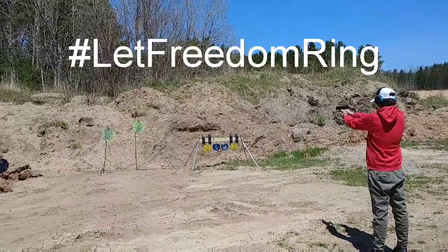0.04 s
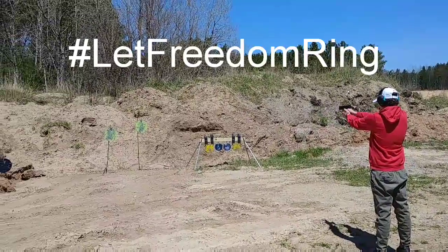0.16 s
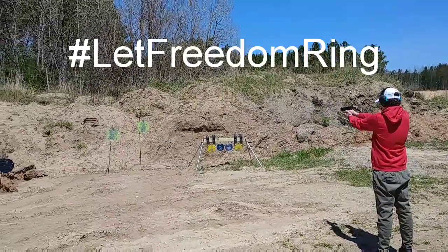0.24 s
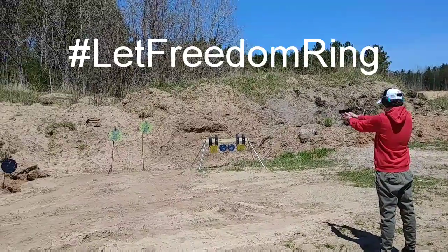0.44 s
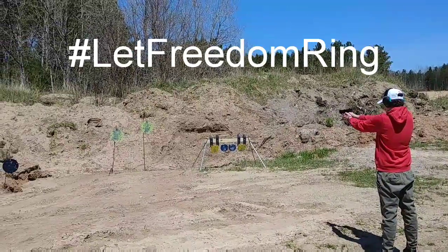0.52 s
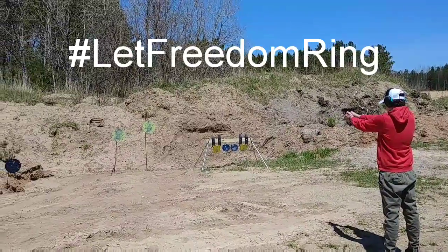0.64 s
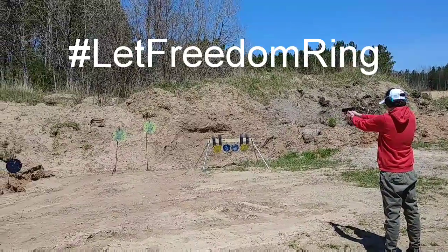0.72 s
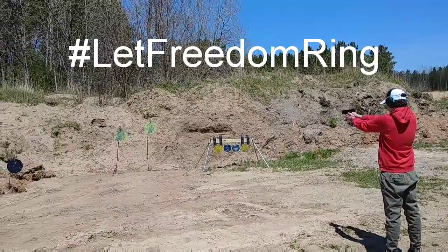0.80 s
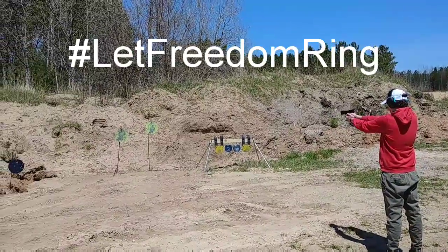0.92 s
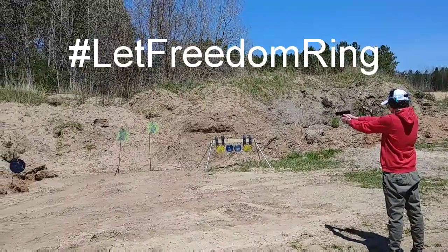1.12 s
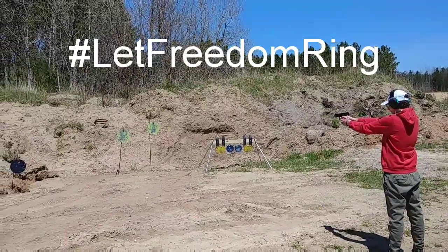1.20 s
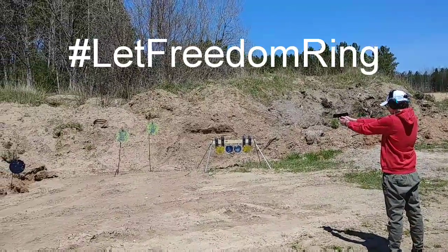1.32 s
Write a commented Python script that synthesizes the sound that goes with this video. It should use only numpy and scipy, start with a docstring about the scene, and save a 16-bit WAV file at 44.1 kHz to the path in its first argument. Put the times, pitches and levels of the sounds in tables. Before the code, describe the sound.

Two loud pistol cracks come in quick succession, slightly overloading a nearby microphone. Right after each one, a steel target clangs and rings out, mixed with short echoes from the sand bank and woods of an open-air range.

```python
"""Two handgun shots at steel plates

Outdoors on a sand range, with a camera's stereo microphone a few metres behind the shooter.
Each muzzle blast overloads the microphone; 40 ms later the bullet smacks a hanging steel plate,
which rings and swings. The sand bank and the woods behind it throw the blasts back."""
import sys
import numpy as np
from scipy import signal
from scipy.fft import rfft, irfft
from scipy.io import wavfile
from scipy.ndimage import uniform_filter1d, minimum_filter1d

SR = 44100
rng = np.random.default_rng(int(sys.argv[2]) if len(sys.argv) > 2 else 0)


def store_wav(level_fs):
    """Save 16-bit WAV to argv[1]."""
    pcm = np.round(np.clip(np.atleast_2d(level_fs), -1, 1) * 32767)
    wavfile.write(sys.argv[1], SR, pcm.T.astype(np.int16))


N = 59535
TIME = np.arange(N) / SR
HZ = np.fft.rfftfreq(N, 1 / SR)


def amp(db):
    """Decibels to gain."""
    return 10 ** (np.asarray(db) / 20)


def unit_rms(x):
    """Scales to rms 1."""
    return x / np.sqrt(np.mean(x ** 2) + 1e-20)


def curve(points, hz):
    """Reads a table on a log-frequency axis."""
    freqs, values = np.transpose(points)
    return np.interp(np.log(hz + 1), np.log(abs(freqs) + 1), values)


def pan(db):
    """Left and right gains for a left-minus-right level."""
    return amp(np.array([[db / 2], [-db / 2]]))


def since(start):
    """Seconds since a moment, zero before it."""
    return np.maximum(TIME - start, 0)


def bell(hz, octaves):
    """A bell-shaped spectrum in dB."""
    return -40 * np.log10(1 + (np.log2((HZ + 1) / hz) / octaves) ** 2 / 2)


def hold_and_decay(t, hold, t60, knee_s=0.04):
    """Level that holds, then bends into an exponential decay."""
    return amp(-60 * knee_s * np.logaddexp(0, (t - hold) / knee_s) / t60)


def falling_sine(t, end_hz, drop_hz, glide_s):
    """A sine that glides down by drop_hz to settle at end_hz."""
    turns = end_hz * t + drop_hz * glide_s * (1 - np.exp(-t / glide_s))
    return np.sin(2 * np.pi * turns)


# How alike the microphone's two ports sound: (frequency [Hz], correlation [-1..1])
PORT_CORRELATION = [(50, -0.1), (200, 0.7), (500, 0.72), (900, 0.075), (1500, -0.44), (2500, -0.028),
                    (5000, -0.19), (15000, -0.53)]

def noise(spectrum_db):
    """Coloured noise as the two microphone ports hear it."""
    left, independent = rfft(rng.standard_normal((2, N)))
    alike = np.clip(curve(PORT_CORRELATION, HZ), -1, 1)
    right = alike * left + np.sqrt(1 - alike ** 2) * independent
    return unit_rms(irfft(np.array([left, right]) * amp(spectrum_db), N))


def burst(start, db, decay, hz, octaves, pan_db):
    """A sudden puff of band noise that dies away."""
    envelope = (TIME > start) * np.exp(-since(start) / decay)
    return amp(db) * pan(pan_db) * envelope * noise(bell(hz, octaves))


def swell(peak_s, db, half_width_s, hz):
    """Band noise that comes and goes smoothly."""
    return amp(db) * np.exp(-((TIME - peak_s) / half_width_s) ** 2) * noise(bell(hz, octaves=0.7))


# Far end of the range: (frequency [Hz], spectral level [dB])
DISTANT_SPECTRUM = [(15, -46), (25, -25), (102, -6.5), (195, -18), (344, -14), (624, -1), (1130, -2.5),
                    (1520, -9.5), (1840, -7), (4250, -37.5), (4870, -33), (14400, -45), (16000, -53.5)]

def distant_range():
    """Far echoes of earlier shots, blurred into a steady bed."""
    return amp(-37) * pan(db=2) * noise(curve(DISTANT_SPECTRUM, HZ))


# Low swells at the microphone: (peak time [s], level [dB], half-width [s], centre [Hz])
RUMBLE_SWELLS = [(0.35, -33, 0.11, 18), (0.71, -44, 0.026, 79), (0.41, -50.5, 0.075, 65)]

def low_rumbles():
    """Low rumbles, mostly on the right port: a deep one under the first plate's ring,
    and a light puff of wind at 0.71 s."""
    steady = amp(-56) * noise(bell(hz=66.5, octaves=0.81))
    return pan(db=-13) * (steady + sum(swell(*rumble) for rumble in RUMBLE_SWELLS))


# Spent cases: (time [s], level [dB], decay [s], centre [Hz], width [octaves], left-right [dB])
CASE_TICKS = [(.036, -43.5, 0.0035, 5650, 0.089, 4), (.703, -45, .012, 4730, 0.54, 8)]

def spent_cases():
    """Spent cases tick faintly, left of the microphone."""
    return sum(burst(*tick) for tick in CASE_TICKS)


# Colour of the echoes from downrange: (frequency [Hz], spectral level [dB])
WASH_SPECTRUM = [(30, -28.5), (150, -20), (350, -21.5), (520, -4.5), (900, -3.5), (1500, -5), (2100, -4.5),
                 (2700, -12), (3700, -10), (5000, -13.5), (7800, -12.5), (9700, -44), (16000, -47)]
# Their decay, before each shot's stretch: (frequency [Hz], T60 [s])
WASH_T60 = [(60, 0.63), (250, 0.92), (700, 0.68), (2000, 0.5), (4500, 0.32), (12000, 0.18)]
# Their balance at the microphone: (frequency [Hz], left-right [dB])
WASH_BALANCE = [(50, -12.5), (200, 4), (700, 4), (2000, 1.5), (5000, 4.5), (15000, -28.5)]

def echo_wash(start, db, hold, stretch, delay_s=0.024, rise_s=0.016):
    """Dense echoes from bank and woods; the level flickers and the treble dies first."""
    hz, t, bands = signal.stft(noise(curve(WASH_SPECTRUM, HZ)), SR, nperseg=512, noverlap=384)
    bands *= hold_and_decay(t[None] - start, hold, stretch * curve(WASH_T60, hz)[:, None])
    bands *= amp(np.array([[0.5], [-0.5]]) * curve(WASH_BALANCE, hz))[:, :, None]
    tail = signal.istft(bands, SR, nperseg=512, noverlap=384)[1][:, :N]
    flicker = amp(2.55 * unit_rms(uniform_filter1d(rng.standard_normal(N), size=300)))
    onset = 1 - np.exp(-since(start + delay_s) / rise_s)
    return amp(db - 16) * onset * flicker * tail


# Reflections: (time [s], level [dB], decay [s], centre [Hz], width [octaves], left-right [dB])
REFLECTIONS = [(.2563, -8, .004, 1600, .6, 3), (.272, -15, .012, 1200, 1.0, 3),
               (.8435, -9.5, .006, 1500, .7, 3), (.358, -15, .03, 700, .55, 4),
               (.925, -12, .016, 950, 1.3, 3), (.428, -18, .02, 1000, .7, 3), (.376, -13, .01, 650, .6, 3),
               (.405, -15, .008, 1200, .8, 3), (.941, -12, .01, 600, .5, 3)]

def distinct_echoes(last_shot):
    """Short reflections follow each shot; one faint echo of the last returns from far off."""
    far_echo = swell(last_shot + 0.542, db=-42, half_width_s=0.027, hz=1800)
    return far_echo + sum(burst(*reflection) for reflection in REFLECTIONS)


# Booms from the bank downrange: (time [s], level [dB])
BANK_BOOMS = [(0.269, -24), (.835, -23.5)]

def bank_boom(start, db, peak_s=0.0098, roughness=0.92):
    """The sand bank returns the thump as a rough boom that falls in pitch."""
    t = since(start)
    tone = falling_sine(t, end_hz=138.3, drop_hz=134.6, glide_s=0.022)
    rumble = roughness * noise(bell(hz=181, octaves=0.82))
    envelope = t / peak_s * np.exp(1 - t / peak_s)
    return amp(db) * envelope * (tone + rumble)


# Impacts downrange: (time [s], level [dB], decay [s], centre [Hz], width [octaves], left-right [dB])
SMACKS = [(.2622, -15, .002, 7000, 1.2, 0), (.8225, -9, .002, 4000, 1.2, 2),
          (.8265, -14, .0012, 5500, .5, 0)]

def bullet_smacks():
    """Bullets hit the steel with short, bright smacks."""
    return sum(burst(*smack) for smack in SMACKS)


def waver(rate_hz=21.2, step=64):
    """Slow random drift of level and phase, different at each port."""
    points = N // step + 2
    real, imag = rng.standard_normal((2, 2, points))
    lowpass = np.exp(-(np.fft.fftfreq(points, step / SR) / rate_hz) ** 2 / 2)
    drift = np.fft.ifft(np.fft.fft(real + 1j * imag) * lowpass)
    drift /= np.sqrt(np.mean(abs(drift) ** 2))
    return np.array([np.interp(TIME, np.arange(points) * step / SR, port) for port in drift])


def plate_shimmer(t, low_hz=5506, top_hz=15340, count=24):
    """A plate's many weak high modes blend into a shimmer."""
    out = np.zeros((2, N))
    for k, (offset, weakness) in enumerate(rng.random((count, 2))):
        hz = low_hz + (top_hz - low_hz) * (k + offset) / count
        out += amp(-10 * weakness) * (waver() * np.exp(2j * np.pi * hz * t)).real
    return unit_rms(out)


# Modes of the two plates hanging downrange: (frequency [Hz], level [dB], T60 [s],
# a dip's time after the hit [s], dip spacing [s], dip floor [0..1], left-right [dB])
FIRST_PLATE_MODES = [(848, -17.5, 0.36, 0.033, 0.25, 0.85, 5.5), (1252, -21, 0.59, 0.056, 0.21, 0.47, 2.5),
                     (2110, -17.5, 0.57, 0.085, 0.3, 0.65, -0.5), (2166, -22, 0.43, 0.18, 0.23, 0.097, 13),
                     (3175, -31.5, 0.66, 0.087, 0.3, 0.05, -15), (3337, -16, 0.28, 0.14, 0.68, 0.35, 18),
                     (3436, -26.5, 0.53, 0.417, 0.36, 0.1, 14.5), (3735, -35, 0.45, 0.36, 0.33, 0.14, -9),
                     (3913, -21, 0.22, 0.2, 0.41, 0.86, -14.5), (4720, -26, 0.72, 0.33, 0.54, 0.27, 1),
                     (5098, -15, 0.46, 0.357, 0.3, 0.75, 8), (5760, -44.5, 0.58, 0.54, 0.36, 0.05, -3),
                     (5960, -18, 0.31, 0.16, 0.68, 0.36, 6.5), (7024, -16, 0.44, 0.082, 0.37, 0.094, -12),
                     (7800, -7, 0.23, 0.21, 0.29, 0.72, -7.5), (7990, -24.5, 0.41, 0.009, 0.38, 0.05, 1),
                     (8200, -33, 0.17, 0.113, 0.16, 0.31, 4), (8960, -33.5, 0.34, 0.27, 0.37, 0.85, 10),
                     (9607, -20, 0.3, 0.045, 0.55, 0.82, 6.5), (10200, -44.5, 0.2, 0.093, 0.15, 0.53, -1.5),
                     (10550, -24.5, 0.34, 0.2, 0.66, 0.074, 12), (10896, -35, 0.61, 0.16, 0.29, 0.08, -4),
                     (11460, -21, 0.2, 0.375, 0.22, 0.17, 13), (11590, -25, 0.26, 0.12, 0.38, 0.52, -18.5),
                     (12893, -39, 0.47, 0.086, 0.22, 0.61, 6), (14000, -19.5, 0.236, 0.18, 0.6, 0.05, 8.5),
                     (16000, -26, 0.27, 0.36, 0.59, 0.05, -8)]
SECOND_PLATE_MODES = [(864, -21.5, 0.41, 0.3, 0.66, 0.35, 2), (1192, -27.5, 0.71, 0.17, 0.23, 0.23, 5),
                      (1993, -8, 0.8, 0.2, 0.26, 0.75, 1.5), (3074, -25, 0.44, 0.076, 0.37, 0.1, -5),
                      (3417, -16.5, 0.2, 0.17, 0.64, 0.15, 8), (3710, -36.5, 0.2, 0.13, 0.11, 0.66, -18),
                      (4630, -36, 0.61, 0.08, 0.37, 0.05, -9), (5085, -10.5, 0.52, 0.17, 0.31, 0.46, 8),
                      (5560, -29.5, 0.45, 0.048, 0.39, 0.05, 6), (5720, -36, 0.72, 0.2, 0.26, 0.58, 8),
                      (6957, -8, 0.4, 0.074, 0.38, 0.14, -1.5), (7860, -23.5, 0.17, 0.23, 0.82, 0.084, 19),
                      (8060, -29.5, 0.18, 0.27, 0.44, 0.12, -12), (8920, -35.5, 0.56, 0.2, 0.25, 0.38, 11),
                      (9045, -33, 0.24, 0.024, 0.22, 0.2, 9.5), (10500, -32, 0.17, 0.28, 0.19, 0.21, 13),
                      (10810, -28, 0.44, 0.47, 0.41, 0.12, -10.5), (11070, -35, 0.2, 0.2, 0.15, 0.18, 23.5),
                      (11300, -36.5, 0.52, 0.005, 0.54, 0.32, 21.5),
                      (11900, -44, 0.2, 0.234, 0.43, 0.05, 3), (13100, -42, 0.52, 0.23, 0.22, 0.35, 9),
                      (13400, -36.5, 0.28, 0.15, 0.35, 0.2, 9), (14746, -34, 0.54, 0.42, 0.43, 0.11, -1)]
# Each plate's ring at the microphone: (lead of the left port [s])
PLATE_LEADS = [.000135, -.00031]
# One hit on each plate: (time [s], level [dB], rise [s], hold [s], relative shimmer level [dB])
PLATE_HITS = [(.262, 2, 0.027, 0.16, -31.5), (0.825, 5, 0.04, 0.23, -29.5)]

def plate_ring(modes, lead, start, db, rise, hold, shimmer_db):
    """A struck plate rings; as it swings, each mode's lobes sweep past the microphone."""
    t, ring = since(start), np.zeros((2, N))
    for hz, mode_db, t60, dip, spacing, floor, pan_db in modes:
        swing = np.pi * (t - dip) / spacing
        lobe = np.hypot(np.sin(swing), floor * np.cos(swing))
        # Reflections make each mode waver, the high ones most.
        reflected = np.clip(0.057 + 0.68 * (hz / 15340) ** 2, 0, 1)
        direct = np.exp(2j * np.pi * (rng.random() - hz * np.array([[0], [lead]])))
        phasor = np.sqrt(1 - reflected ** 2) * direct + reflected * waver()
        tone = (phasor * np.exp(2j * np.pi * hz * t)).real
        ring += amp(mode_db) * pan(pan_db) * lobe * hold_and_decay(t, hold, t60) * tone
    ring += amp(shimmer_db) * plate_shimmer(t) * hold_and_decay(t, hold, t60=0.43)
    return amp(db) * (1 - np.exp(-t / rise)) * ring


def microphone_thump(start, left_db=-48, right_db=-14, fade_s=0.033):
    """The pressure wave sets the right microphone port swinging, slower and slower."""
    t = since(start)
    swing = falling_sine(t, end_hz=51.6, drop_hz=125, glide_s=0.0097)
    return amp([[left_db], [right_db]]) * swing * np.exp(-(t / fade_s) ** 2)


# The muzzle blast from a few metres behind: (frequency [Hz], spectral level [dB])
BLAST_SPECTRUM = [(88, -40), (150, 0), (716, -1), (2500, -4.5), (3840, -3), (4240, -10.5), (7920, -5),
                  (9820, -23.5), (14800, -15), (16000, -28)]
# Its scatter off the near ground: (frequency [Hz], spectral level [dB])
SCATTER_SPECTRUM = [(120, -9), (200, -7), (328, -9), (735, 0), (1400, -5), (1940, -4), (7410, -16.5),
                    (9400, -22.5), (16000, -37.5)]

def muzzle_blast(start, db, rise_s=0.00039, overload=0.9):
    """Crack, body, ground bounce and scatter add up and overload the microphone."""
    t = since(start)
    crack = burst(start, db=-7, decay=0.0015, hz=4000, octaves=0.4, pan_db=3.5)
    body = amp(-2.5) * np.exp(-t / 0.0043) * noise(curve(BLAST_SPECTRUM, HZ))
    bounce = burst(start + 0.0034, db=-0.5, decay=0.0014, hz=1110, octaves=0.66, pan_db=6)
    scatter = amp(-20) * pan(db=10) * np.exp(-t / 0.1) * noise(curve(SCATTER_SPECTRUM, HZ))
    pressure = amp(db) * (1 - np.exp(-t / rise_s)) * (crack + body + bounce + scatter)
    return overload * np.tanh(pressure / overload)


# At the firing line: (time [s], blast gain [dB], wash gain [dB], wash hold [s], T60 stretch [ratio])
SHOTS = [(.2192, -1, 1, 0.26, 0.65), (0.7849, -1, 0, 0.25, 0.89)]

def scene():
    """The range from behind the shooter: two shots, their echoes and the ringing plates."""
    out = distant_range() + low_rumbles()
    for start, blast_db, wash_db, hold, stretch in SHOTS:
        out += muzzle_blast(start, blast_db) + microphone_thump(start)
        out += echo_wash(start, wash_db, hold, stretch)
    out += distinct_echoes(last_shot=SHOTS[-1][0]) + bullet_smacks() + spent_cases()
    for boom in BANK_BOOMS:
        out += bank_boom(*boom)
    for modes, lead, hit in zip((FIRST_PLATE_MODES, SECOND_PLATE_MODES), PLATE_LEADS, PLATE_HITS):
        out += plate_ring(modes, lead, *hit)
    return out


def record(dry):
    """The camera's fast limiter holds the peaks under full scale; a low-pass cuts the top treble."""
    ceiling, cutoff_hz = 0.97, 16100
    safe_gain = np.minimum(1, ceiling / (abs(dry) + 1e-9))
    gain = uniform_filter1d(minimum_filter1d(safe_gain, size=65, axis=1), size=65, axis=1)
    lowpass = signal.firwin(255, cutoff_hz, window=("kaiser", 8), fs=SR)
    return signal.oaconvolve(dry * gain, lowpass[None], "same")


dry = scene()
out = record(dry)
store_wav(out)
```